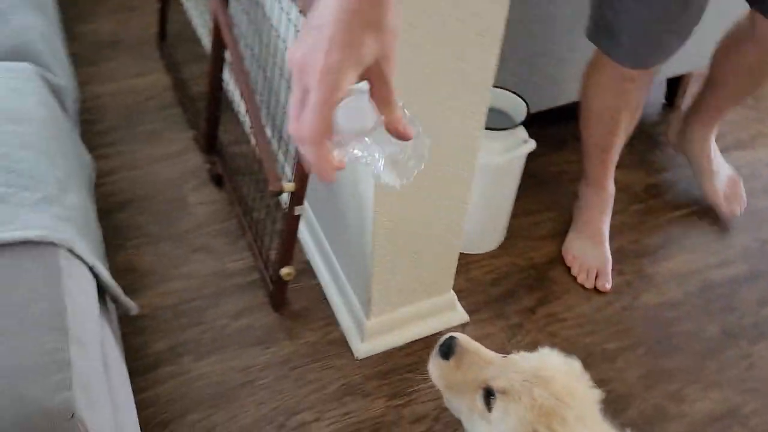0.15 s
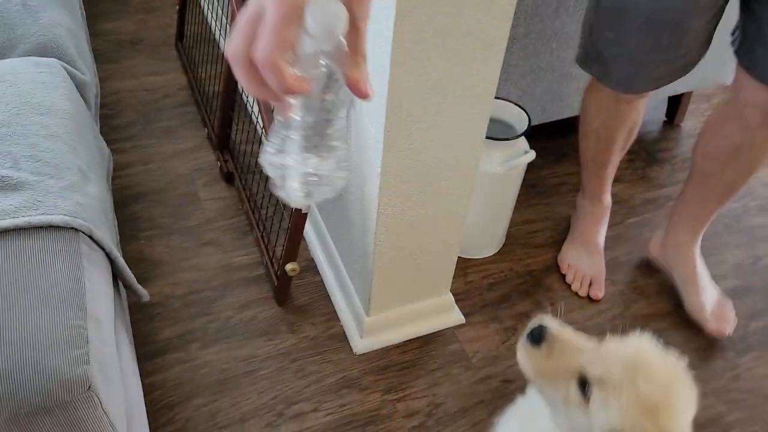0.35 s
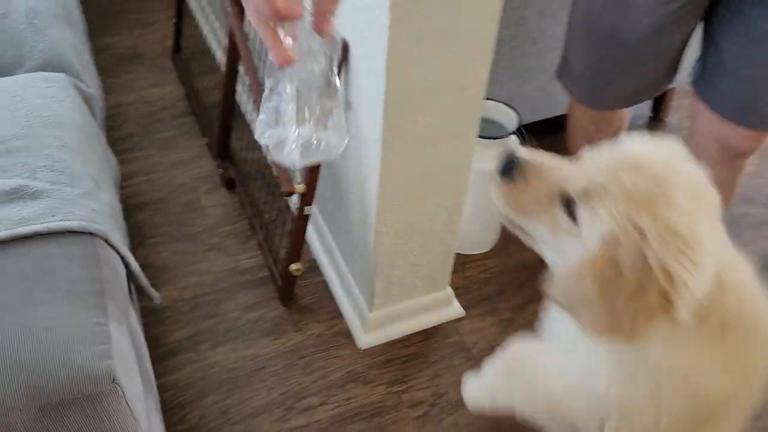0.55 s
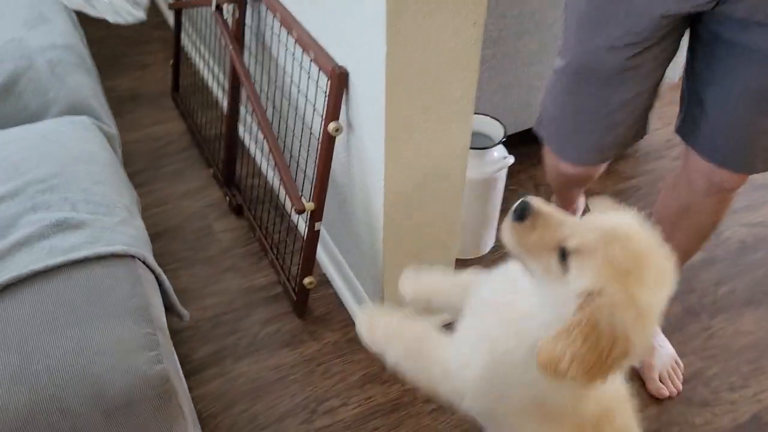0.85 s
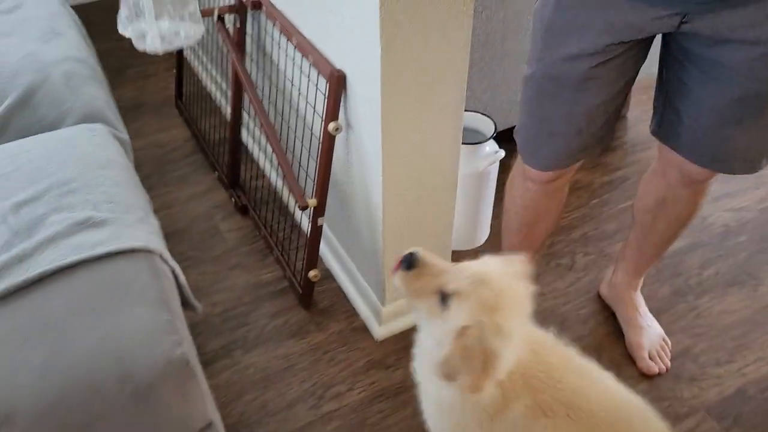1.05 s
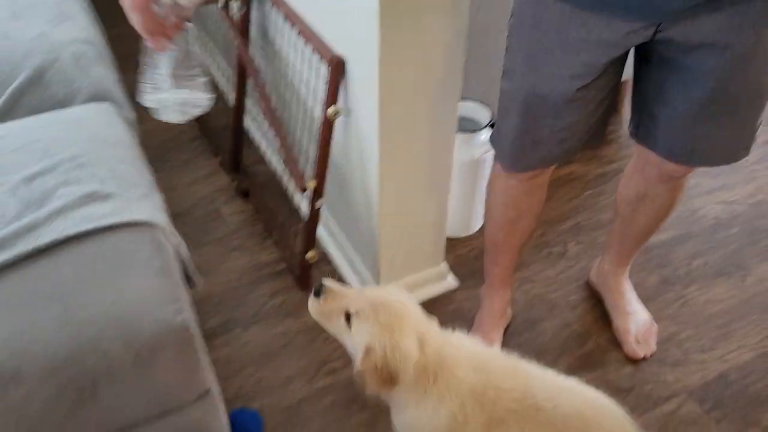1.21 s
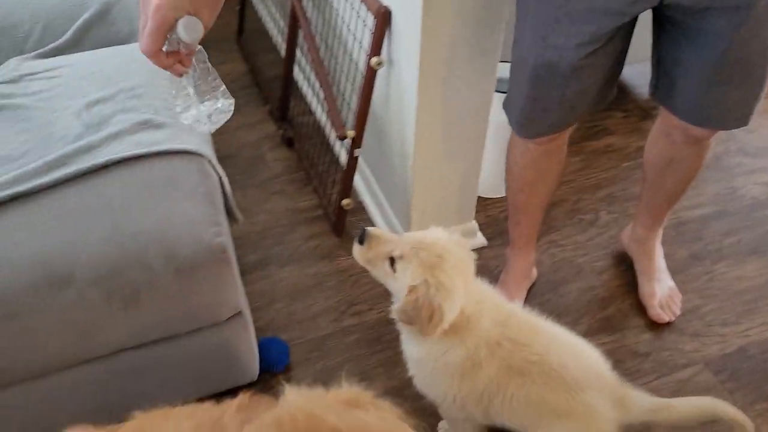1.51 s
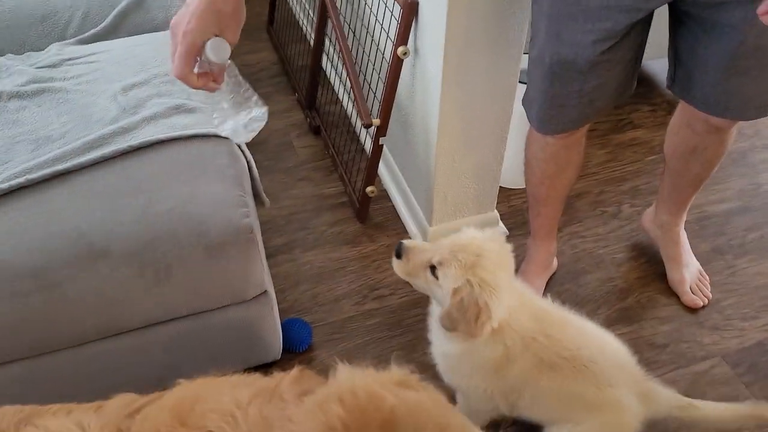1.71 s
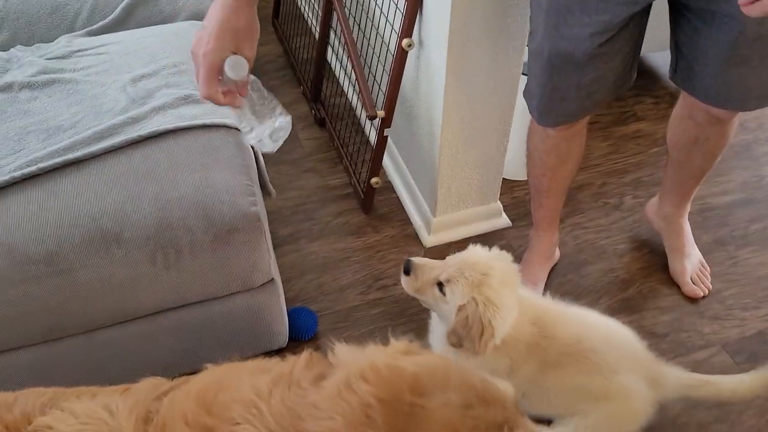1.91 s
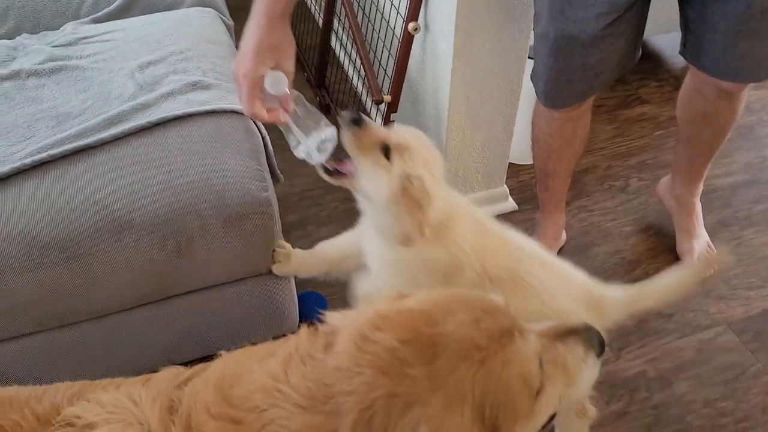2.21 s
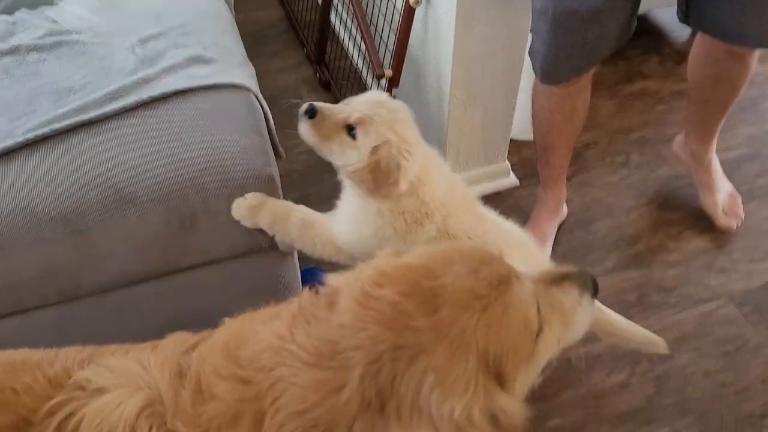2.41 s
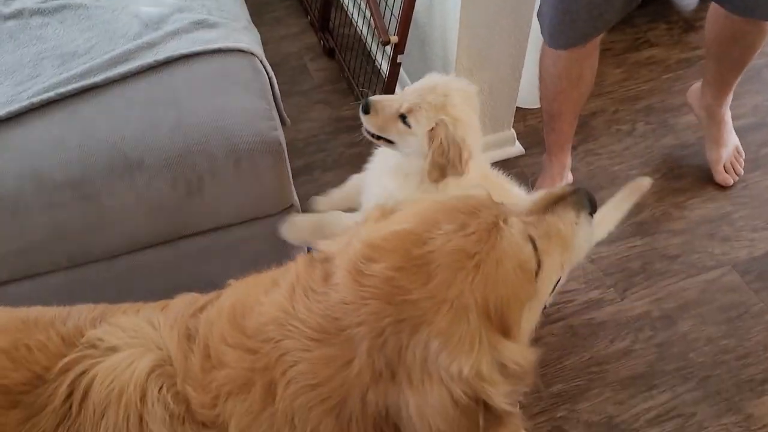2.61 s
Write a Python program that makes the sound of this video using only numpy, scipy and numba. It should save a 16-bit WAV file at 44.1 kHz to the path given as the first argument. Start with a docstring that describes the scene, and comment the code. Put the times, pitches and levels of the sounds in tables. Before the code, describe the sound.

A thin empty plastic bottle is squeezed and shaken, crackling and snapping sharply in a living room.

```python
"""Thin plastic bottle, living room

A thin plastic bottle, probably with treats in it, is squeezed and shaken a metre from a phone's two
microphone ports in a furnished living room. Snapping dents and popping walls are damped tones struck through
the wall's modes; a dense crackle of tiny strikes swells with every shake. A diffuse noise tail gives the
room's brief answer. Filtered noise makes the low house rumble, an earlier crackle dying away and a dog's
soft huff at the end; a wavering sine makes the hum, and damped low tones the footfalls."""
import sys
import numpy as np
from scipy import signal
from scipy.fft import rfft, irfft
from scipy.io import wavfile
from scipy.ndimage import uniform_filter1d
from numba import njit

SR = 44100
rng = np.random.default_rng(int(sys.argv[2]) if len(sys.argv) > 2 else 0)


def int16_out(signal):
    """Quantize to a 16-bit WAV file."""
    q = np.round(np.clip(np.atleast_2d(signal).T, -1, 1) * 32767)
    wavfile.write(sys.argv[1], SR, q.astype(np.int16))


N = 121275  # samples, 2.75 s

# House noise through the room, coloured: pitch_hz, level_db (relative)
HOUSE_COLOUR = [(25, -20), (60, -19.5), (110, -12.5), (250, -13), (500, -15), (1000, -18), (3000, -36),
                (8000, -43), (16000, -59)]
# Difference between the ports in that noise, least in the deep bass: pitch_hz, level_db (relative)
HOUSE_SIDE_COLOUR = [(40, -7), (120, -1), (500, 0)]
HOUSE_DB, HUM_DB = -53.5, -60  # before they waver
HOUSE_WAVER_DB, HOUSE_WAVER_PER_S = 2.5, 20
HUM_HZ, HUM_WAVER_HZ = 59.8, 4

# Earlier crackle still dying away in the room: pitch_hz, level_db (relative)
FADING_COLOUR = [(150, 1), (500, -4.5), (2000, -1.5), (7000, -17.5), (16000, -38)]
FADING_DB, FADING_T60_S = -48, 0.78  # level before the decay

# Soft footfalls through the floor: start_s, level_db (before the push softens it), pitch_hz
FOOTFALLS = [(.075, -42.5, 69), (.21, -35, 71), (.38, -44.5, 112), (.93, -46, 65), (1.5, -41.5, 69),
             (2.25, -33.5, 78), (2.67, -41.5, 113)]
FOOTFALL_PUSH_S, FOOTFALL_T60_S = 0.0066, 0.11

# Modes of the bottle wall, before scatter and damping by the hand: pitch_hz, level_db (relative), t60_s
LOW_MODES = [(419, -21.5, 0.12), (775, -9.5, 0.021), (1234, -14, 0.098), (1405.6, -8, 0.09),
             (1676, 1.5, 0.014), (1947, -1.5, 0.029), (2294, -1.5, 0.044), (2547, 3.5, 0.017),
             (3086, 0.5, 0.042)]
HIGH_MODES = [(3620, -6, 0.021), (4253, -1.5, 0.015), (4945, -7, 0.02), (5560, -7, 0.016),
              (6166, 0, 0.0068), (6890, -6, 0.01)]
CRACK_MODES = [(8330, -9.5, 0.0081), (10010, -8, 0.0099), (11840, -4.5, 0.0051), (13900, -11, 0.0067)]
MODE_SCATTER, MODE_SCATTER_DB = .055, 3  # share of the pitch, and level
FOCUS_DB, FOCUS_OCT = 7, .3  # lift of the modes near an event's pitch, and its reach
PORT_SCATTER = .85  # radians by which a mode differs between the ports
BASS_TURN = 1.1  # radians between the ports for low knocks

# Swells of fine crackle, one per squeeze or shake; rise and fall are the times of a 10 dB change:
# peak_s, rise_s, fall_s, low_modes_db (relative), high_modes_db (relative), singing_dent_hz
SHAKES = [(0.221, 0.0037, 0.072, -44.5, -66, 1080), (0.249, 0.0088, 0.014, -31, -36, 2800),
          (0.296, 0.014, 0.02, -31.5, -46, 1370), (0.33, 0.022, 0.027, -30, -38, 2480),
          (.375, 0.019, 0.039, -34, -32, 2610), (0.416, 0.0071, 0.022, -28, -31.5, 2368),
          (0.448, 0.024, 0.058, -45, -43.5, 1400), (0.578, 0.023, 0.015, -37, -42, 2220),
          (.645, 0.029, 0.022, -22.5, -30, 2265), (0.681, 0.042, 0.036, -24.5, -26.5, 2190),
          (0.797, 0.021, 0.024, -23.5, -22, 2126), (0.854, 0.038, 0.05, -30.5, -39.5, 2860),
          (0.973, 0.011, 0.0067, -28, -25.5, 2500), (1.018, 0.031, 0.022, -28, -29, 1450),
          (1.042, 0.02, 0.028, -31.5, -27, 2290), (1.09, 0.032, 0.041, -27, -31, 1640),
          (1.153, 0.011, 0.049, -32.5, -32, 1950), (1.197, 0.0067, 0.014, -20, -28, 2240),
          (1.275, 0.02, 0.025, -30, -33, 1880), (1.318, 0.044, 0.11, -29.5, -34.5, 2180),
          (1.423, 0.011, 0.012, -26.5, -31, 2040), (1.508, 0.013, 0.022, -24, -29, 2050),
          (1.54, 0.022, 0.049, -34, -38, 2480), (1.622, 0.014, 0.11, -41, -35.5, 1950),
          (1.65, 0.0075, 0.017, -22.5, -31, 2530), (1.718, 0.017, 0.037, -22, -30, 2370),
          (1.837, 0.019, 0.021, -26.5, -32.5, 2370), (1.907, 0.022, 0.037, -26.5, -29.5, 1465),
          (2.027, 0.038, 0.015, -33, -36, 2700), (2.095, 0.03, 0.027, -26, -31, 2676),
          (2.206, 0.032, 0.026, -29.5, -34, 2040), (2.279, 0.037, 0.035, -30.5, -38.5, 1540),
          (2.379, 0.011, 0.019, -33, -33.5, 1460), (2.423, 0.061, 0.02, -36.5, -36.5, 2790),
          (2.519, 0.044, 0.087, -43.5, -50, 1540), (2.614, 0.041, 0.12, -49, -54.5, 1510)]
CRACKLE_PER_S, CRACKLE_PUSH_S = 550, .0003
CRACKLE_SPREAD_DB, CRACKLE_CRACK_DB = 0.5, -13  # per unit of strike size; crack against high modes
DENT_DB, DENT_T60_S, DENT_PUSH_S = -7.5, 0.071, 0.0012  # singing dent, relative to the low modes
# A small thin wall radiates little bass: pitch_hz, level_db (relative)
THIN_WALL = [(150, -20), (380, 0)]

ROOM_DB, ROOM_ONSET_S = -9.5, .005
ROOM_T60_S, ROOM_TREBLE_T60_S = 0.33, 0.26  # below and above about 3 kHz

# Loud snaps of the wall, levels before the trim of each mode group:
# start_s, pitch_hz (where it rings most), low_modes_db, high_modes_db, crack_db
SNAPS = [(0.216, 1130, -40, -53, -68), (0.241, 6200, -23, -20.5, -38), (0.2433, 2800, -19.5, -21, -51),
         (0.258, 5200, -48, -20, -54), (0.2931, 1500, -29, -30, -57), (0.3163, 3180, -9, -7.5, -46),
         (0.3186, 2300, -13, -10.5, -51), (0.316, 2400, -11.5, -32, -50), (0.331, 2410, -33, -31, -53),
         (0.3606, 4480, -30, -7, -20.5), (0.364, 4400, -46, -13, -45), (0.4089, 2300, -26, -32, -48),
         (0.4185, 2270, -14.5, -14.5, -40), (0.4407, 3480, -15.5, -12, -33), (0.4438, 1500, -21, -31, -40),
         (0.5653, 2360, -4.5, -11.5, -27), (0.5655, 1370, -14, -5, -31), (0.5991, 7460, -13.5, -7, -25),
         (0.626, 2310, -9, -7.5, -18.5), (0.6306, 2220, -10, -11.5, -29), (0.6395, 1550, -14, -14, -41),
         (0.6625, 2770, -14, -12, -29), (0.6734, 6960, -24, -5.5, -20.5), (0.6863, 6000, -18, -12.5, -40),
         (0.7386, 2800, -31, -21, -35.5), (0.745, 2300, -43, -21, -42), (0.7696, 6140, -37, -27, -37),
         (0.7813, 1910, -10.5, -35, -28), (0.7876, 2170, -13, -28, -55), (0.7989, 3990, -14, -6.5, -45),
         (0.8066, 2200, -38, -12, -23.5), (0.8325, 2090, -17.5, -35, -48), (0.8435, 3180, -11.5, -3, -23.5),
         (0.8515, 3436, -11, -4.5, -47), (0.96, 2700, -12, -8, -17), (0.9693, 4500, -14, -8, -31),
         (0.9972, 2670, -19.5, -26, -26), (1.0343, 4600, -19, -14, -29), (1.0402, 6700, -22, -7.5, -32),
         (1.043, 5440, -23, -15, -26), (1.052, 6560, -20, -11.5, -26), (1.0723, 1590, -21, -35, -44),
         (1.0761, 4700, -24, -15, -42), (1.081, 1550, -28, -9.5, -46), (1.0854, 4970, -35, -14.5, -43),
         (1.092, 1660, -35, -11, -39), (1.0969, 2870, -18.5, -14, -44), (1.113, 4400, -25, -3, -33),
         (1.1179, 1900, -21, -25, -49), (1.138, 5650, -31, -23, -39), (1.154, 5000, -31, -27, -48),
         (1.165, 5050, -39, -18, -47), (1.277, 1630, -27, -30, -46), (1.29, 1610, -30, -15, -47),
         (1.2983, 2740, -11, -11, -24), (1.3133, 2710, -16, -9.5, -26), (1.3224, 2820, -14, -11, -34),
         (1.3587, 2400, -19, -21, -38), (1.4213, 2450, -18.5, -24, -45), (1.464, 2750, -23, -20, -37),
         (1.5321, 2830, -24, -27, -46), (1.6048, 5270, -37, -25.5, -58), (1.6478, 3330, -16.5, -28, -49),
         (1.6955, 5400, -31, -20, -49), (1.7205, 1930, -8.5, -28, -50), (1.8095, 5530, -45, -23, -44),
         (1.91, 1467, -20.5, -38, -56), (1.9833, 2700, -23, -32, -42), (2.025, 2515, -13.5, -40, -52),
         (2.0757, 2530, -32, -21, -41), (2.096, 2840, -15, -28, -46), (2.0983, 2530, -10, -38, -52),
         (2.165, 5560, -55, -24, -37.5), (2.201, 1550, -17, -43, -38), (2.3493, 4300, -59, -36, -42),
         (2.3772, 1480, -23, -42, -56), (2.3997, 2890, -44, -17, -46), (2.4257, 2900, -26.5, -30, -48),
         (2.4307, 2870, -59, -22, -40), (2.4355, 2860, -27.5, -20, -43), (2.4618, 4440, -26, -15, -36),
         (2.4795, 6660, -43, -32, -33.5), (2.4866, 4600, -30, -18, -52), (2.5128, 3050, -42, -18, -35),
         (2.5162, 3100, -33, -19, -40), (2.6051, 1550, -28, -19.5, -38.5), (2.639, 2350, -33, -24.5, -41),
         (2.7192, 5450, -34, -30.5, -40)]
SNAP_TRIM_DB, SNAP_PUSH_S = (-6, -6, 2.5), .0003  # low, high, crack; buckling time
SNAP_RING = (.22, .3, .6)  # share of each group's t60 that a hand-damped snap rings
SNAP_SPREAD = 1.3  # radians: the modes of a snap start nearly together
DENT_SNAP_DB, DENT_SNAP_CYCLES, HIGH_FROM_HZ = 4, 32, 3500  # the snapping dent's own ring
# A single dent radiates still less bass: pitch_hz, level_db (relative)
SMALL_DENT = [(300, -18), (900, 0)]

# The whole wall pops: start_s, level_db (before the push softens it), pitch_hz
POPS = [(.566, -18.5, 636), (.626, -20, 380), (0.627, -9.5, 795), (0.628, -25.5, 119), (0.778, -47, 306),
        (0.854, -30, 198), (0.96, -24, 412), (1.112, -25.5, 370)]
POP_CYCLES, POP_PUSH_S = 2.8, 0.0001

# Resonances of the dog's breath: pitch_hz, width_hz, level_db (relative)
HUFF_RESONANCES = [(438, 330, 0.5), (621, 110, 2), (1230, 590, -6.5)]
HUFF_S, HUFF_DB, HUFF_RISE_S, HUFF_FALL_S = 2.665, -43.5, 0.05, 0.053  # level before the swell

# Contrast of the two microphone ports, shared out below: pitch_hz, left_minus_right_db (unscaled)
PORTS = [(60, -1), (150, -0.5), (500, 1), (1300, 1.5), (2400, -4), (4400, -5.5), (8000, -4), (15000, 3)]
LEFT_SHARE, RIGHT_SHARE = 0.29, -0.75
LEFT_LEAD_S = .00014
# Treble roll-off of the phone: pitch_hz, level_db (relative)
PHONE_TREBLE = [(12000, 0.5), (14500, -6.5), (16500, -13)]
CEILING, TOP_HZ = .92, 16500  # full scale is 1


def undb(db):
    """Amplitude factor for a level in dB."""
    return 10 ** (np.asarray(db) / 20)


def level(x, db):
    """Set the overall RMS level in dB."""
    return x * undb(db) / np.sqrt(np.mean(x ** 2))


def colour(x, table, share=1.):
    """Filter by (Hz, dB) points joined along log frequency, with the dB scaled by share."""
    hz, db = np.array(table).T
    f = np.maximum(np.fft.rfftfreq(x.shape[-1], 1 / SR), 1)
    gain = undb(share * np.interp(np.log(f), np.log(hz), db))
    return irfft(rfft(x) * gain, x.shape[-1])


def walk(rate):
    """Random levels held for 1 / rate s and slewed; spread near 1."""
    k = int(SR / rate)
    held = np.repeat(rng.standard_normal(N // k + 1), k)
    return 1.64 * uniform_filter1d(uniform_filter1d(held, k), k)[:N]


@njit
def ring(n, start, hz, t60, push, size, turn, skew):
    """Sum of modes at both ports, each swelling over the push time and decaying at its t60."""
    out = np.zeros((2, n))
    for j in range(len(start)):
        step = np.exp(2j * np.pi * hz[j] / 44100 - 6.908 / (t60[j] * 44100))
        z = size[j] * np.exp(1j * turn[j])
        unpushed, push_step = 1., np.exp(-1 / (push * 44100))
        to_right = np.exp(1j * skew[j])
        # cut off after about two thirds of the t60
        for i in range(start[j], min(n, start[j] + int(t60[j] * 30000))):
            z *= step
            unpushed *= push_step
            out[0, i] += z.real * (1 - unpushed)
            out[1, i] += (z * to_right).real * (1 - unpushed)
    return out


def knocks(table, t60, push_s, turn=0.):
    """One damped tone for each row of start, level and pitch."""
    t, db, hz = np.array(table).T
    start = (t * SR).astype(np.int64)
    skew = turn + .5 * PORT_SCATTER * rng.standard_normal(len(t))
    return ring(N, start, 1. * hz, t60 + 0 * t, push_s, undb(db), 0 * t, skew)


def strike(times, db, modes, share, push_s, pitch_hz, spread=2 * np.pi):
    """Every event rings all modes, detuned and unevenly, most of all those near its pitch."""
    hz, mode_db, t60 = np.array(modes).T
    detune, uneven, turn, skew, delay = rng.standard_normal((5, len(times), len(modes)))
    start = ((times[:, None] + push_s * np.abs(delay)) * SR).astype(np.int64)
    f = np.minimum(hz * (1 + MODE_SCATTER * detune), .45 * SR)
    focus_db = FOCUS_DB * np.exp(-(np.log2(f / pitch_hz) / FOCUS_OCT) ** 2)
    gain = undb(mode_db + MODE_SCATTER_DB * uneven + focus_db)
    # the event's level sets the RMS of its mode sizes
    gain = undb(db)[:, None] * gain / np.sqrt((gain ** 2).mean(axis=1, keepdims=True))
    decay = share * t60 * np.ones_like(gain)
    return ring(N, start.ravel(), f.ravel(), decay.ravel(), 1. * push_s, gain.ravel(),
                spread * turn.ravel(), PORT_SCATTER * skew.ravel())


def house_rumble():
    """Wavering low noise, most alike at both ports in the deep bass."""
    mid, side = colour(rng.standard_normal((2, N)), HOUSE_COLOUR)
    side = colour(side, HOUSE_SIDE_COLOUR)
    air = level(mid + side * np.array([[1], [-1]]), HOUSE_DB)
    return air * undb(HOUSE_WAVER_DB * walk(HOUSE_WAVER_PER_S))


def house_hum():
    """One low sine that wavers in pitch and level, the same at both ports."""
    pitch = HUM_HZ + HUM_WAVER_HZ * walk(21)
    gain = undb(HUM_DB + 4.5 * walk(15))
    return gain * np.sin(2 * np.pi * np.cumsum(pitch) / SR)


def fading_crackle():
    """The room's remnant of an earlier crackle: coloured noise in exponential decay."""
    t = np.arange(N) / SR
    noise = colour(rng.standard_normal((2, N)), FADING_COLOUR)
    return level(noise, FADING_DB) * undb(-60 * t / FADING_T60_S)


def footfalls():
    """Soft steps through the floor: slowly pushed, damped low tones."""
    return knocks(FOOTFALLS, FOOTFALL_T60_S, FOOTFALL_PUSH_S, BASS_TURN / 2)


def crackle():
    """Tiny uneven strikes, probably rattling treats, ring the wall and swell with each shake; a dent sings."""
    peak, rise, fall, low_db, high_db, dent_hz = np.array(SHAKES).T[..., None]
    d = np.arange(N) / SR - peak
    swell = undb(-10 * np.abs(d) / np.where(d < 0, rise, fall))
    low, high = (np.sqrt(((undb(db) * swell) ** 2).sum(axis=0)) for db in (low_db, high_db))
    # the shake strongest in the low modes sets the pitch
    sings = dent_hz[(undb(low_db) * swell).argmax(axis=0), 0]

    count = int(CRACKLE_PER_S * N / SR)
    when = rng.uniform(0, N / SR, count)
    size_db = CRACKLE_SPREAD_DB * np.minimum(rng.exponential(size=count), 3.5)
    pitch = sings[(when * SR).astype(int), None]
    crack = high * undb(CRACKLE_CRACK_DB)
    strikes = 0
    for modes, gain in ((LOW_MODES, low), (HIGH_MODES, high), (CRACK_MODES, crack)):
        struck = strike(when, size_db, modes, 1.0, CRACKLE_PUSH_S, pitch)
        strikes = strikes + gain * level(struck, 0)

    start = rng.integers(0, N, count)
    detune, uneven, turn = rng.standard_normal((3, count))
    hz = sings[start] * (1 + 0.0074 * detune)
    dent = ring(N, start, hz, np.full(count, DENT_T60_S), DENT_PUSH_S,
                undb(6 * uneven), 9 * turn, PORT_SCATTER * detune)
    # the dent keeps closer to the peaks than the strikes do
    dent_gain = low * np.sqrt(swell.max(axis=0))
    return colour(strikes + dent_gain * level(dent, DENT_DB), THIN_WALL)


def room(x):
    """Diffuse reflections as a noise tail, unrelated left and right, shorter in the treble."""
    t = np.arange(SR // 2) / SR
    noise = rng.standard_normal((2, len(t)))
    low = signal.sosfilt(signal.butter(2, 3000, fs=SR, output="sos"), noise)
    tail = low * undb(-60 * t / ROOM_T60_S) + (noise - low) * undb(-60 * t / ROOM_TREBLE_T60_S)
    tail = tail * np.minimum(t / ROOM_ONSET_S, 1)
    tail = tail / np.sqrt((tail ** 2).sum(axis=1, keepdims=True))
    return undb(ROOM_DB) * signal.fftconvolve(x[None], tail, axes=1)[:, :N]


def snaps():
    """Dents buckle through, ringing the hand-damped wall modes and a tone of their own."""
    s = np.array(SNAPS)
    start, pitch, low_db, high_db = s[:, 0], s[:, 1], s[:, 2], s[:, 3]
    out = 0
    for k, modes in enumerate((LOW_MODES, HIGH_MODES, CRACK_MODES)):
        db = s[:, k + 2] + SNAP_TRIM_DB[k]
        # every mode rings twice, detuned apart
        out = out + strike(start, db, 2 * modes, SNAP_RING[k], SNAP_PUSH_S, pitch[:, None], SNAP_SPREAD)
    own_db = np.where(pitch < HIGH_FROM_HZ, low_db + SNAP_TRIM_DB[0], high_db + SNAP_TRIM_DB[1])
    own_ring = np.c_[start, DENT_SNAP_DB + own_db, pitch]
    out = out + knocks(own_ring, DENT_SNAP_CYCLES / pitch, SNAP_PUSH_S)
    return colour(out, SMALL_DENT)


def wall_pops():
    """Dull pops of the whole wall: tones that die within a few cycles."""
    return knocks(POPS, POP_CYCLES / np.array(POPS)[:, 2], POP_PUSH_S, BASS_TURN)


def dog_huff():
    """A short breath of noise shaped by throat resonances."""
    t, f = np.arange(N) / SR - HUFF_S, np.fft.rfftfreq(N, 1 / SR)
    throat = sum(undb(db) / (1 + ((f - hz) / width * 2) ** 2) for hz, width, db in HUFF_RESONANCES)
    air = level(irfft(rfft(rng.standard_normal(N)) * throat, N), HUFF_DB)
    return air * np.exp(-(t / np.where(t < 0, HUFF_RISE_S, HUFF_FALL_S)) ** 2)


def scene():
    """Bottle and dog reach the ports directly and by the room; the house and fading sounds are added."""
    dry = crackle() + snaps() + wall_pops() + dog_huff()
    f = np.fft.rfftfreq(N, 1 / SR)
    left = irfft(rfft(dry[0]) * np.exp(2j * np.pi * f * LEFT_LEAD_S), N)
    heard = np.array([left, dry[1]]) + room(dry[1])
    heard = heard + house_rumble() + house_hum() + fading_crackle() + footfalls()
    return np.array([colour(heard[0], PORTS, LEFT_SHARE), colour(heard[1], PORTS, RIGHT_SHARE)])


def record(dry):
    """The phone rounds the loudest peaks, rolls off and cuts the top."""
    rounded = CEILING * np.tanh(dry / CEILING)
    soft = colour(rounded, PHONE_TREBLE)
    return signal.sosfilt(signal.ellip(8, .2, 70, TOP_HZ, fs=SR, output="sos"), soft)


dry = scene()
out = record(dry)
int16_out(out)
```